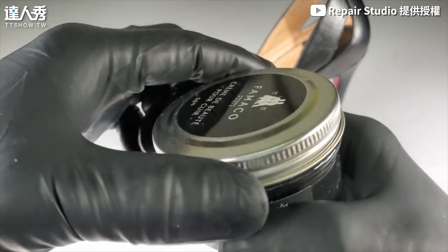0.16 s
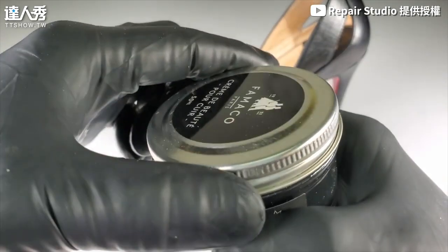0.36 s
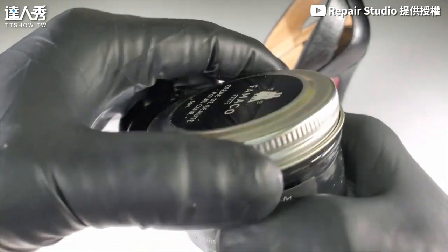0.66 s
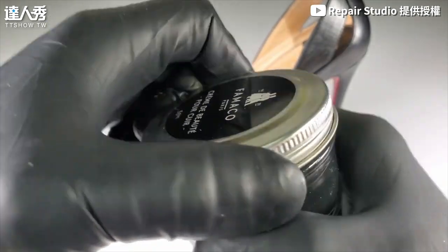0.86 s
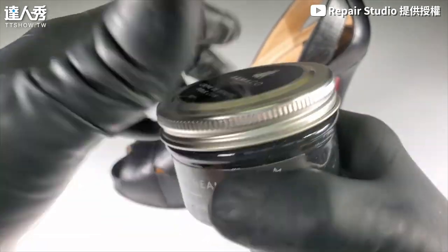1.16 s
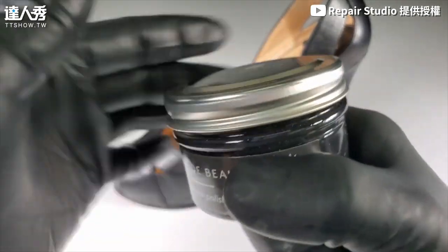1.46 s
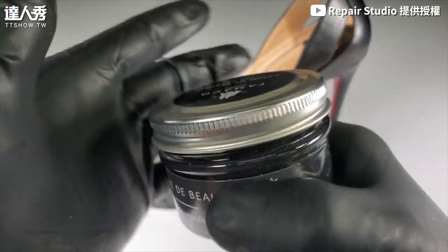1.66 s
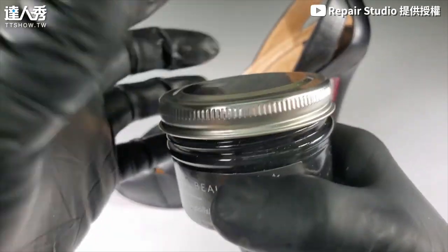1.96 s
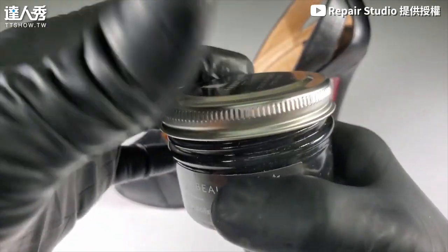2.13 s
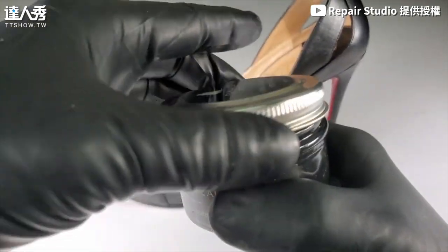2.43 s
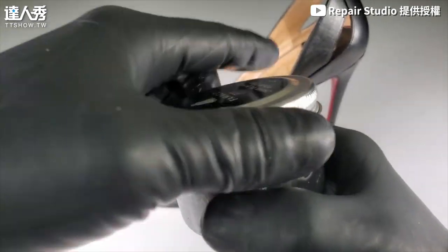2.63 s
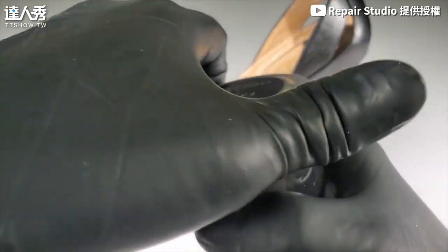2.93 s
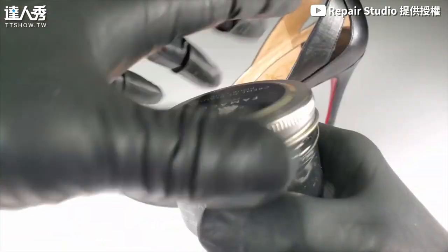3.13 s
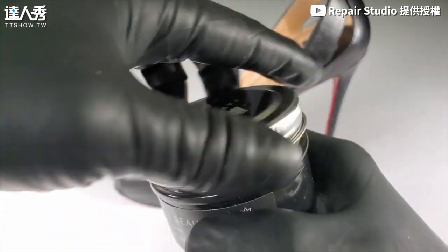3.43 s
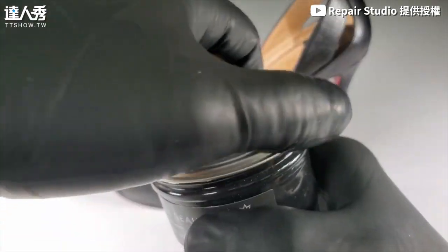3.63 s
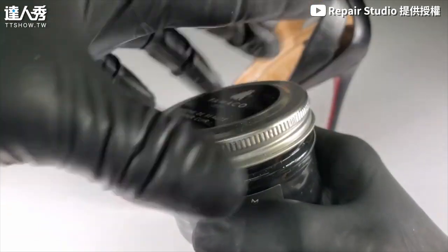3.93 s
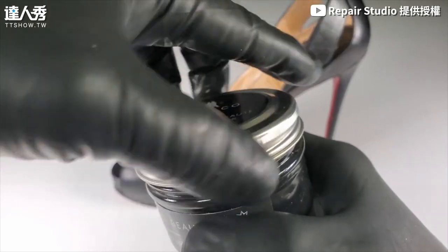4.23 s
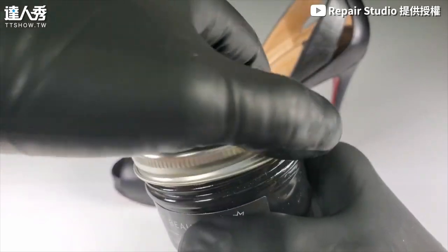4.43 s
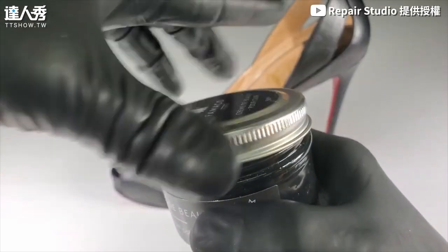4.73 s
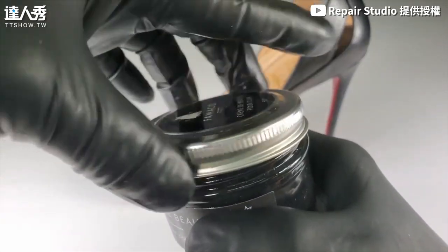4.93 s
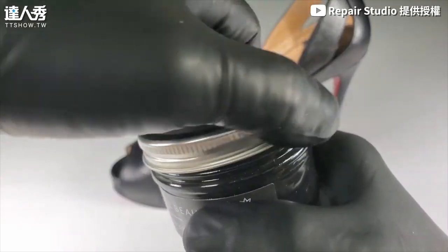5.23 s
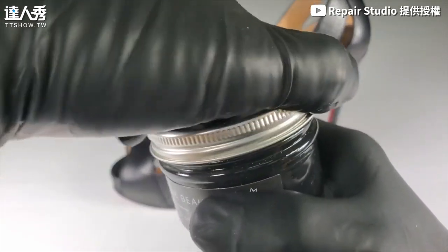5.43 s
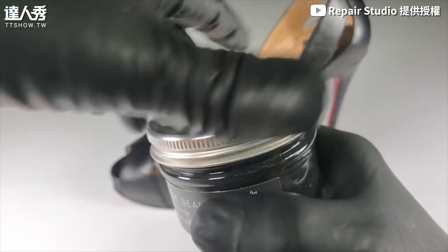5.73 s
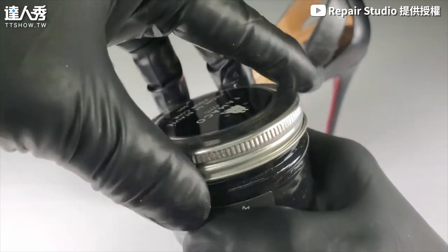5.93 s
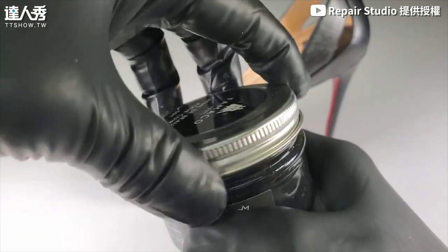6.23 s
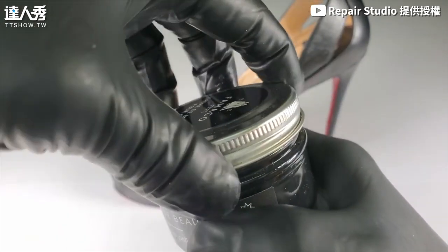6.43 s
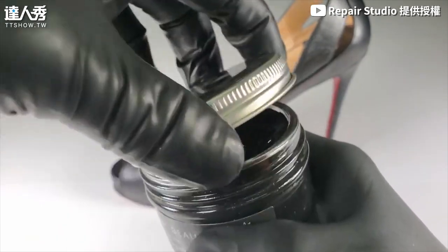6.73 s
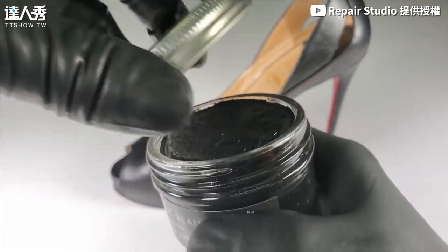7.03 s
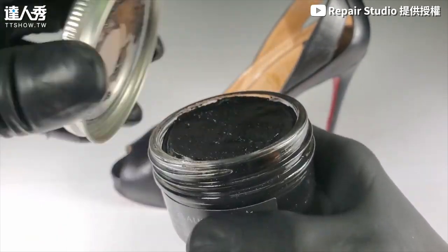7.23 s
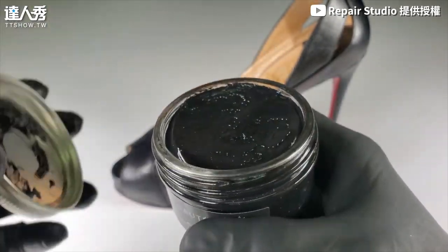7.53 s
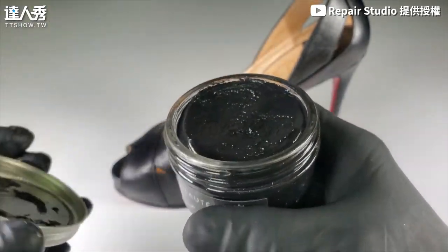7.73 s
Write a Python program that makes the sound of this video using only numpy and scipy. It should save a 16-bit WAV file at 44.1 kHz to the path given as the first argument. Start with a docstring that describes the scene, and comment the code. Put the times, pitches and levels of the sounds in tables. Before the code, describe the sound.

Low room rumble and faint hiss run throughout, in a small workshop with short dull reflections, heard very close. Rubber gloves rustle softly from 0 s; a short lid turn grates near 0.9 s. At 1.3 s comes a loud knock, then bright, gritty metal-on-glass scrapes at 1.5-1.75 and 1.8-2.0 s, the thin rim ringing briefly. Quieter rubs and a glove snap follow until 2.75 s. From 3.0 to 6.1 s the lid is twisted in short uneven bursts, with thread knocks around 3.05, 3.5, 3.7, 4.6, 4.95 and 5.95 s, a small scrape at 3.1 s, and tiny sagging squeaks near 3.4, 4.6, 5.0 and 5.65 s. After a lull, the lid pops loose with a hollow double clack at 6.6 s, and clinks lightly at 6.8 s. Fine rubber rustling rises from 7.3 s to the end, with minute squeaks around 7.7-7.8 s.

```python
"""Over a low room rumble, rubber gloves rustle in fine grains, then turn the thin metal lid of a cream jar up close.
Turns and hard scrapes grate as bunched slips through the lid's modes; thread knocks and glove snaps are clicks with skids.
The rim sings on in long sine tones, and stick-slip squeaks sag in pitch during the later turns, knocks and glove rubs.
The lid pops loose, clinks on the rim, and the gloves rustle on; a small workshop adds dull reflections.
Each contact has a level (its low body) and a hardness: how far its ring and its treble grit stand above that body."""
import sys
import numpy as np
from scipy import signal
from scipy.fft import rfft, irfft
from scipy.io import wavfile

SR = 44100
rng = np.random.default_rng(int(sys.argv[2]) if len(sys.argv) > 2 else 0)


def generate_wav(sig):
    """Save sig (samples, or channels by samples) to the path in sys.argv[1] as 16-bit PCM at SR."""
    pcm = np.round(np.clip(np.atleast_2d(sig).T, -1, 1) * 32767).astype(np.int16)
    wavfile.write(sys.argv[1], SR, pcm)


N = 347155
TIME = np.arange(N) / SR
RING_TIME = TIME[:SR // 4]

# In every contact table, ring/dB and grit/dB are relative to level/dB.
# course of the room rumble before its trim: t/s, level/dB
RUMBLE_LEVEL = [(0.0, -38), (0.13, -43), (1.51, -41), (1.56, -45.5), (2.39, -48.5), (3.99, -43),
                (4.03, -49), (4.51, -40.5), (7.21, -44.5), (7.45, -47.5), (7.78, -44), (7.87, -45)]
# colour of the room rumble: f/Hz, level/dB
RUMBLE_COLOUR = [(13, -84), (22, -33), (27, -27), (34, -15), (45, -14), (70, 2), (124, -1.5), (173, -10),
                 (216, -17.5), (247, -11), (286, -17.5), (301, -23.5), (332, -35), (362, -18), (420, -34.5),
                 (550, -44), (920, -120)]
# colour of the room hiss: f/Hz, level/dB
HISS_COLOUR = [(180, -40), (300, 2.5), (737, -4), (1120, -4), (1190, -13), (1720, -7.5), (2520, -15),
               (2700, -11.5), (4370, -13), (8940, -20), (16000, -27.5)]
# likeness of left and right: f/Hz, correlation/1
STEREO_LIKENESS = [(60, 0.74), (250, 0.58), (600, 0.78), (1300, 0.81), (2500, 0.81), (5000, 0.14),
                   (12000, 0)]

# gloves rubbing, before the rustle trim: t/s, rise/s, fall/s, peak level/dB
GLOVE_RUBS = [(0.0, 0.22, .22, -56.5), (0.56, 0.49, .04, -55.5), (1.139, 0.077, 0.25, -55),
              (2.05, 0.078, 0.033, -65), (2.31, 0.022, 0.026, -53.5), (3.931, 0.032, 0.057, -52),
              (4.7, .08, 0.09, -52), (7.1, 0.039, 0.16, -63), (7.37, 0.12, 0.13, -47.5),
              (7.55, 0.2, 0.054, -46.5), (7.77, 0.11, .1, -47.5)]
# rubber snaps of the gloves: t/s, level/dB, ring/dB, grit/dB, skid/s
GLOVE_SNAPS = [(1.294, -50, -2, 3.5, .0011), (1.47, -37.5, -0.5, -6, .0006), (2.14, -42.5, 2, -10, 0.0019),
               (4.921, -54.5, -0.5, 11, 0.01), (5.772, -40.5, -4, -17, 0.0012),
               (7.126, -69, 17.5, -11, 0.0025), (7.817, -64, 21, -7, 0.0019)]
# colour of rustling rubber: f/Hz, level/dB
RUBBER_COLOUR = [(400, -26), (1000, -13), (1400, -14), (2200, 1.5), (2900, -3), (4000, 2), (6000, -6),
                 (8000, -5.5), (11000, -11.5), (16000, -26)]

# light turns of the lid: t/s, rise/s, fall/s, peak level/dB, ring/dB, grit/dB
LID_TURNS = [(0.905, 0.013, 0.025, -33.5, -2.5, -9.5), (1.005, 0.02, 0.14, -45.5, 4, -5),
             (1.48, 0.021, 0.022, -39.5, -5, -9.5), (2.46, 0.24, 0.029, -45.5, -5, -11),
             (2.733, 0.019, 0.026, -40.5, -1.5, -19), (2.84, 0.15, 0.011, -48, -2.5, -10.5),
             (3.03, 0.018, 0.041, -32, -14, -9), (3.395, 0.072, 0.12, -34, -7, -13),
             (3.59, 0.1, 0.037, -45, -4.5, -13.5), (3.71, 0.041, 0.042, -33.5, -4, -15),
             (4.165, 0.032, 0.16, -43, -7.5, -8), (4.26, .07, 0.073, -42.5, -5.5, -7.5),
             (4.39, 0.1, .025, -35.5, -6.5, -14.5), (4.545, 0.039, 0.023, -32.5, -6, -20),
             (4.998, 0.02, 0.043, -33.5, -6, -16), (5.06, 0.097, 0.16, -39.5, -5.5, -8.5),
             (5.52, 0.19, 0.14, -51.5, -10, -8.5), (5.66, 0.012, 0.013, -43.5, -11, 2.5),
             (5.94, 0.023, 0.1, -43, -8, -7.5), (6.11, 0.018, 0.12, -56, -8, -14),
             (6.32, 0.015, 0.0091, -45, -6.5, -23)]
# hard scrapes of bare metal on glass, one curve each, before their trim: t/s, level/dB, ring/dB, grit/dB
LID_SCRAPES = [
    [(1.51, -33, -8, -14), (1.524, -36.5, -7, -21), (1.534, -29.5, 3, -1), (1.55, -24, -4, -4.5),
     (1.578, -30, -2, -2.5), (1.598, -28, 2.5, 6.5), (1.646, -34.5, 5, 7.5), (1.676, -31.5, 5.5, 3.5),
     (1.765, -59.5, 6.5, -2)],
    [(1.808, -30.5, 11, 12.5), (1.824, -28, -4, -11), (1.848, -27.5, 8.5, 5), (1.88, -24.5, -2.5, 6.5),
     (1.92, -36.5, 6, 12), (1.978, -30.5, 0, 6), (1.998, -37, -1, 7.5), (2.025, -63, -5, 13)],
    [(3.09, -32, 3, 1), (3.112, -33.5, 1, 1), (3.12, -41.5, 9, 12.5), (3.145, -61, 1, -7)],
]
# the thread knocks the lid: t/s, level/dB, ring/dB, grit/dB, skid/s
THREAD_KNOCKS = [(1.31, -19.5, 0.5, -10.5, 0.0011), (1.801, -30.5, 3, 7, 0.0064),
                 (2.747, -35.5, -19, -7, 0.0014), (3.011, -43.5, 15, 13.5, 0.00062),
                 (3.03, -34.5, 8.5, -10, 0.00084), (3.0495, -27.5, 1.5, 5, .001),
                 (3.092, -28, -6, 4, 0.00096), (3.307, -42, -12, -22, 0.0027),
                 (3.373, -37, -3, -11, 0.0012), (3.504, -28.5, -6, -20, 0.005),
                 (3.721, -24, -6, -5.5, 0.0016), (3.781, -39.5, 4, -9, 0.00056),
                 (3.832, -55, 13, -11, 0.0027), (4.591, -22, -7.5, -7, 0.0021),
                 (4.951, -28.5, -16, -11, 0.0011), (5.159, -33, -2, -5, .0011),
                 (5.33, -32.5, -45, -26, 0.00078), (5.46, -39, 3.5, -3.5, .0015),
                 (5.651, -39, 6, 10.5, 0.0012), (5.657, -45, 17, 9, 0.0014),
                 (5.936, -28.5, -6, -13, 0.0027), (5.964, -27, -3, -0.5, 0.00089),
                 (6.005, -34, -13, -14, 0.0012), (6.104, -32, -9.5, 0, 0.00049),
                 (6.679, -42.5, 7.5, -12, .0012), (6.704, -49.5, 5, 7.5, 0.0012)]
# resonances of the lid seated on the jar: f/Hz, width/Hz, level before weighting by width/dB
SEATED_LID_MODES = [(425, 60, -14), (690, 90, -7), (885, 55, 2), (990, 70, -1), (1125, 55, -1),
                    (1220, 24, 8), (1690, 70, -13), (1970, 90, -7), (2145, 70, -1), (3250, 30, -6),
                    (3499, 14, -7), (3865, 26, 1), (4110, 120, -2), (4375, 70, 1), (4565, 30, 0),
                    (5093, 32, 0), (5280, 40, -4), (5990, 58, -4), (6790, 140, 0), (7068, 24, -4),
                    (7564, 40, -11), (8400, 30, -10), (9190, 40, -5), (11325, 80, 0), (11900, 50, -6)]
# dense, heavily damped modes between the resonances: f/Hz, level/dB
SHELL_COLOUR = [(100, -22), (300, -15), (620, -2), (1100, 0), (1450, -11.5), (2100, 4), (2700, -5),
                (4100, -1), (6500, -7.5), (10000, -5), (12200, -15.5), (13700, -8.5), (14600, -35),
                (16000, -19.5)]

# the fingers ease off and the rim rings on: t/s, level/dB, damping by the grip/Hz
RIM_RINGS = [(1.7, -35, 4.6), (1.995, -58, 1), (3.112, -42, 0.3), (3.507, -32.5, 8.7), (4.595, -28, 27)]
# modes of the rim before the grip damps them: f/Hz, level/dB, t60/s
RIM_MODES = [(3499, 0, .5), (3865, -8, .17), (6842, -12, .2), (9190, -8, .2)]
# stick-slip squeaks of lid and rubber: t/s, length/s, starting f/Hz, level before flutter/dB
SQUEAKS = [(3.417, 0.023, 2044, -30.5), (3.42, 0.031, 2660, -38.5), (3.438, 0.0484, 2033, -35),
           (3.748, .02, 1200, -45), (4.142, .056, 2130, -48), (4.555, .021, 970, -26.5),
           (4.585, 0.018, 580, -30), (4.758, 0.058, 2100, -53.5), (5, 0.0313, 1073, -27),
           (5.029, 0.021, 980, -26), (5.647, .016, 5400, -33), (5.661, 0.034, 1270, -37.5),
           (7.686, 0.024, 3050, -45), (7.805, 0.0238, 4150, -45)]

# the lid pops off the jar mouth: t/s, level/dB, ring/dB, grit/dB, skid/s
LID_POPS = [(6.5882, -19.5, -17, -0.5, 0.0027), (6.5918, -17, -3.5, -17, .0027),
            (6.610, -29, 2, -1, 0.0052)]
# the free lid clinks on the rim: t/s, level/dB, ring/dB, grit/dB, skid/s
LID_CLINKS = [(6.795, -44.5, 15.2, 17, 0.0029), (6.8095, -47.5, 14, 24.6, 0.0038)]
# resonances of the jar mouth with the lid just parting: f/Hz, width/Hz, level before weighting by width/dB
JAR_MOUTH_MODES = [(307, 280, -9.5), (900, 97, -11), (1120, 80, 1), (1395, 39, 6), (1604, 47, -2),
                   (2180, 190, 1.5), (2770, 27, 0.5), (4140, 30, -2), (4710, 82, -6), (4970, 46, -12),
                   (6450, 68, -10), (9900, 48, -17)]
# resonances of the free lid: f/Hz, width/Hz, level before weighting by width/dB
FREE_LID_MODES = [(1950, 60, -11), (3910, 70, -9), (4320, 100, -8), (6490, 48, 2), (6710, 56, 1),
                  (9350, 80, -12), (10100, 160, -13)]

# crossovers from body to ring and from ring to grit: f/Hz
REGISTER_EDGES = (1500, 5000)
CUTOFF_HZ = 15900

# a stroke catches, swells as the hand presses, fades as it eases, and lets go
CATCH_S, LET_GO_S, OFF_CONTACT_DB = 0.015, 0.066, 18
TURN_SWELL_DB, TURN_FADE_DB = 6, 8
RUB_SWELL_DB, RUB_FADE_DB = 6, 12.5
TICKS_PER_S, TICK_DB = 30, -10.5  # now and then a turning lid catches and ticks
BLOW_S = 0.008  # the level of a blow's body is its rms over this time
HARDER_DB_PER_OCTAVE = 41  # a blow that rings more has a stiffer, higher contact
SQUEAK_SAG = 0.08  # share of its pitch that a squeak loses as it slows


def from_db(db):
    """Decibels to gain."""
    return 10 ** (np.asarray(db) / 20)


def rms_one(x):
    """Scale to an rms of 1."""
    return x / np.sqrt(np.mean(x ** 2) + 1e-20)


def energy_one(x):
    """Scale to an energy of 1, averaged over the channels."""
    return rms_one(x) / np.sqrt(x.shape[-1])


def pan(db):
    """Channel gains that set the left above the right by this many dB."""
    return from_db(np.array([[db], [-db]]) / 2)


def at_hz(points, hz):
    """Read a table on a log-frequency axis."""
    known_hz, values = np.transpose(points)
    return np.interp(np.log(hz + 1), np.log(known_hz), values)


def cut(x, hz, kind, order=2):
    """A Butterworth low- or high-pass."""
    return signal.sosfilt(signal.butter(order, hz, kind, fs=SR, output="sos"), x)


def convolve(x, response):
    """Sound a response with an excitation, no longer than the scene."""
    return signal.oaconvolve(np.atleast_2d(x), response, axes=1)[:, :N]


def drift(per_s, size):
    """Smooth random wandering, rms 1."""
    knots = rng.standard_normal(size // 4)
    return rms_one(np.interp(TIME[:size] * per_s, np.arange(len(knots)), knots))


def noise(spectrum, size):
    """Coloured stereo noise, alike in the bass and diffuse in the treble; rms 1."""
    hz = np.fft.rfftfreq(size, 1 / SR)
    mid, side = rfft(rng.standard_normal((2, size)))
    alike = at_hz(STEREO_LIKENESS, hz)
    both = np.sqrt(1 + alike) * mid + np.sqrt(1 - alike) * side * [[1], [-1]]
    return rms_one(irfft(both * from_db(at_hz(spectrum, hz)), size))


def room_tone():
    """A low rumble whose level wavers and a faint even hiss, both of coloured noise."""
    rumble_gain = from_db(1.0 + np.interp(TIME, *np.transpose(RUMBLE_LEVEL)))
    rumble = rumble_gain * noise(RUMBLE_COLOUR, N) * pan(4.4)
    hiss = from_db(-57.5) * noise(HISS_COLOUR, N) * pan(0.99)
    return rumble + hiss


def stroke(row, swell_db, fade_db):
    """The course of one stroke: rows of time, level and its unchanging hardness."""
    s, rise, fall, peak_db, *hardness = row
    times = s + np.cumsum([-CATCH_S, CATCH_S, rise, fall, LET_GO_S])
    drops = np.array([swell_db + OFF_CONTACT_DB, swell_db, 0, fade_db, fade_db + OFF_CONTACT_DB])
    return [(t, db, *hardness) for t, db in zip(times, peak_db - drops)]


def gain_in_time(rows):
    """A level curve as a gain, silent outside it."""
    s, db = np.transpose(rows)
    return from_db(np.interp(TIME, s, db)) * (TIME >= s[0]) * (TIME <= s[-1])


def friction(size, per_s, spread_db, judder_db, judder_per_s):
    """Tiny slips of uneven size, bunched as the surfaces catch and let go; rms 1."""
    unevenness = np.minimum(rng.exponential(1, size), 4)
    sizes = from_db(spread_db * unevenness) * rng.choice([-1, 1], size)
    slips = rng.random(size) < per_s / SR
    judder = from_db(judder_db * drift(judder_per_s, size))
    return rms_one(slips * sizes * judder)


def damped(spectrum, t60):
    """A crowd of modes too dense to tell apart, dying together."""
    decay = from_db(-60 * RING_TIME / t60)
    return energy_one(noise(spectrum, len(RING_TIME)) * decay)


def registers(response):
    """Split a response into body, ring and grit, which a contact excites by its hardness."""
    parts = []
    for hz in REGISTER_EDGES:
        parts.append(cut(response, hz, "low", order=3))
        response = cut(response, hz, "high", order=3)
    return [energy_one(part) for part in parts + [response]]


def strike(events, contact, soft_hz, skid_db, contact_hz, contact_db, contact_q):
    """Each blow is a click and a dying skid, softened and coloured by the springy contact point."""
    out = np.zeros((2, N + SR))
    t = RING_TIME[:SR // 32]
    for s, level_db, ring_db, grit_db, skid_s in events:
        skid = energy_one(rng.standard_normal(len(t)) ** 3 * np.exp(-t / skid_s))
        push = from_db(skid_db) * skid
        push[0] += 1  # the click
        push = cut(push, soft_hz, "low")
        spring_hz = contact_hz * 2 ** (ring_db / HARDER_DB_PER_OCTAVE)
        spring = signal.lfilter(*signal.iirpeak(spring_hz, contact_q, fs=SR), push)
        push = push + from_db(contact_db) * spring
        start = round(s * SR)
        for hardness_db, part in zip((0, ring_db, grit_db), contact()):
            blow = from_db(level_db + hardness_db) * energy_one(convolve(push, part))
            out[:, start:start + blow.shape[1]] += blow * np.sqrt(BLOW_S * SR)
    return out[:, :N]


def gloves():
    """Rubber rustles in fine grains from two creases at once, and snaps now and then."""
    def crease():
        grains = friction(N, per_s=820, spread_db=-1.0, judder_db=5.0, judder_per_s=45)
        return convolve(grains, damped(RUBBER_COLOUR, t60=0.014))

    def rubber():
        return registers(damped(RUBBER_COLOUR, t60=0.016))

    rubbing = sum(gain_in_time(stroke(row, RUB_SWELL_DB, RUB_FADE_DB)) for row in GLOVE_RUBS)
    rustle = from_db(-2.0) * rubbing * rms_one(crease() + crease())
    snaps = strike(GLOVE_SNAPS, rubber, soft_hz=14000, skid_db=4.0,
                   contact_hz=2800, contact_db=-1.0, contact_q=1.5)
    return (rustle + snaps) * pan(0.37)


def ringing(modes):
    """Each mode of a body as a dying complex tone, with its frequency."""
    hz, width, db = np.transpose(modes)[:, :, None]
    return hz, from_db(db) * width * np.exp((2j * np.pi * hz - np.pi * width) * RING_TIME)


def touch(body, grip_hz, shell_db, shell_t60, uneven_db=5.0):
    """Response at one contact point: each mode has its own strength and direction, and the grip damps them all."""
    hz, tones = body
    strength, side = rng.standard_normal((2, len(hz)))
    # a phase skew between the channels gives each mode its likeness of left and right
    skew = np.arccos(at_hz(STEREO_LIKENESS, hz[:, 0])) / 2 * np.sign(side)
    signs = (-1) ** np.arange(len(hz))
    weights = signs * from_db(uneven_db * strength) * np.exp(1j * skew * [[1], [-1]])
    modes = energy_one((weights @ tones).imag)
    response = modes + from_db(shell_db) * damped(SHELL_COLOUR, shell_t60)
    return registers(response * np.exp(-np.pi * grip_hz * RING_TIME))


def grind(strokes, contact, slipping, count=3):
    """In each stroke the lid rubs at a few new points round the thread, each with its own slips and colour."""
    out = np.zeros((2, N + SR))
    for rows in strokes:
        s, level_db, ring_db, grit_db = np.transpose(rows)
        start, stop = round(s[0] * SR), round(s[-1] * SR)
        curves = level_db, level_db + ring_db, level_db + grit_db
        for point in range(count):
            slips = slipping(SR)[:stop - start] / np.sqrt(count)
            for db, part in zip(curves, contact()):
                gain = from_db(np.interp(TIME[start:stop], s, db))
                sound = convolve(slips * gain, part)
                out[:, start:start + sound.shape[1]] += sound
    return out[:, :N]


def lid_on_thread():
    """The seated lid is rubbed under a firm grip, scraped under a light one and knocked by the glass thread."""
    lid = ringing(SEATED_LID_MODES)

    def held():
        return touch(lid, grip_hz=31.8, shell_db=7, shell_t60=0.097)

    def loose():
        return touch(lid, grip_hz=0.7, shell_db=-4.5, shell_t60=0.027)

    def knocked():
        return touch(lid, grip_hz=16.6, shell_db=-2.0, shell_t60=0.13)

    def coarse(size):
        slips = friction(size, per_s=1300, spread_db=2.0, judder_db=3.5, judder_per_s=72.2)
        ticks = friction(size, per_s=TICKS_PER_S, spread_db=5.5, judder_db=2.0, judder_per_s=13.5)
        return slips + from_db(TICK_DB) * ticks

    def fine(size):
        return friction(size, per_s=2800, spread_db=3.5, judder_db=2, judder_per_s=170)

    turn_strokes = [stroke(row, TURN_SWELL_DB, TURN_FADE_DB) for row in LID_TURNS]
    turns = grind(turn_strokes, held, coarse)
    scrapes = cut(grind(LID_SCRAPES, loose, fine), 520, "high")
    knocks = strike(THREAD_KNOCKS, knocked, soft_hz=9500, skid_db=-4.0,
                    contact_hz=1080, contact_db=4.5, contact_q=1.2)
    return turns * pan(1.3) + from_db(2.0) * scrapes * pan(0.41) + knocks * pan(0.76)


def rim_rings():
    """The thin rim sings on in dying sines as the fingers ease off; what grip remains damps it."""
    out = np.zeros((2, N))
    for s, level_db, grip_hz in RIM_RINGS:
        start = round(s * SR)
        grip = np.exp(-np.pi * grip_hz * RING_TIME)
        for hz, db, t60 in RIM_MODES:
            phase = 2 * np.pi * hz * RING_TIME + rng.normal(0, 0.62, (2, 1))
            decay = from_db(level_db + db - 60 * RING_TIME / t60)
            out[:, start:start + len(RING_TIME)] += decay * grip * np.sin(phase)
    return out


def squeaks(waver=0.038, flutter_db=3, octave_db=-17):
    """Slips briefly lock into a rough, sagging tone with a faint octave."""
    out = np.zeros(N)
    for s, length, hz, db in SQUEAKS:
        start, size = round(s * SR), round(length * SR)
        sag = np.linspace(1, 1 - SQUEAK_SAG, size)
        pitch = hz * sag * (1 + waver * drift(937, SR)[:size])
        phase = 2 * np.pi * np.cumsum(pitch) / SR
        flutter = flutter_db * drift(430, SR)[:size]
        swell = signal.windows.tukey(size, 0.6) * from_db(db + flutter)
        out[start:start + size] += swell * (np.sin(phase) + from_db(octave_db) * np.sin(2 * phase))
    return out * pan(1.4)


def lid_coming_off():
    """The lid parts from the jar mouth with a hollow pop, then its own modes clink on the rim."""
    def mouth():
        return touch(ringing(JAR_MOUTH_MODES), grip_hz=7, shell_db=-5, shell_t60=0.1)

    def free():
        return touch(ringing(FREE_LID_MODES), grip_hz=3, shell_db=-5.5, shell_t60=0.1)

    pop = strike(LID_POPS, mouth, soft_hz=14100, skid_db=1.0,
                 contact_hz=950, contact_db=-11, contact_q=5.4)
    clinks = strike(LID_CLINKS, free, soft_hz=12000, skid_db=3.0,
                    contact_hz=870, contact_db=0, contact_q=4.3)
    return pop * pan(0.86) + clinks * pan(0.69)


def workshop(x, wet_db, t60, wall_hz):
    """Dull, diffuse reflections that build up over a few milliseconds."""
    build_up = 1 - np.exp(-RING_TIME / 0.0018)
    decay = from_db(-60 * RING_TIME / t60)
    tail = rng.standard_normal((2, len(RING_TIME))) * decay * build_up
    tail = cut(tail, wall_hz, "low", order=1)
    return x + from_db(wet_db) * convolve(x, energy_one(tail))


def scene():
    """The handling sounds in the workshop, over its room tone."""
    handling = gloves() + lid_on_thread() + rim_rings() + squeaks() + lid_coming_off()
    return room_tone() + workshop(handling, wet_db=-15.5, t60=0.29, wall_hz=6500)


def record(dry):
    """The microphone sheds the deepest bass, and the top is cut steeply."""
    thinned = cut(dry, 35, "high")
    steep = signal.ellip(10, 0.1, 80, CUTOFF_HZ, fs=SR, output="sos")
    return signal.sosfilt(steep, thinned)


dry = scene()
out = record(dry)
generate_wav(out)
```